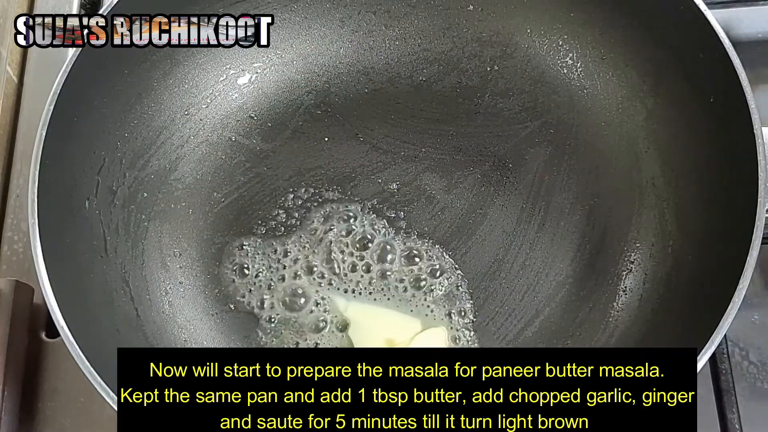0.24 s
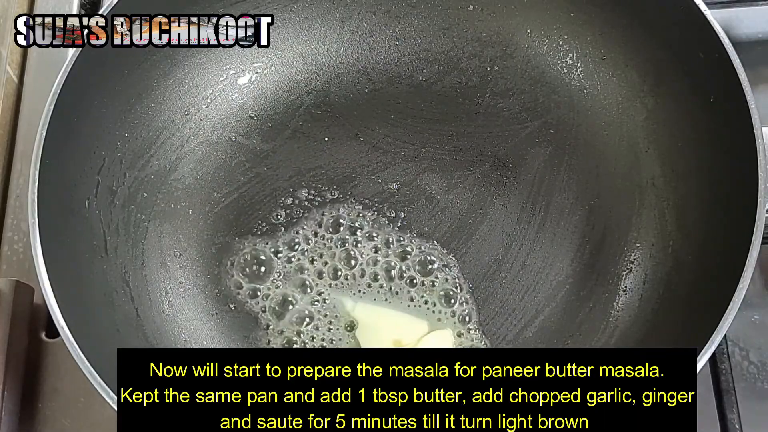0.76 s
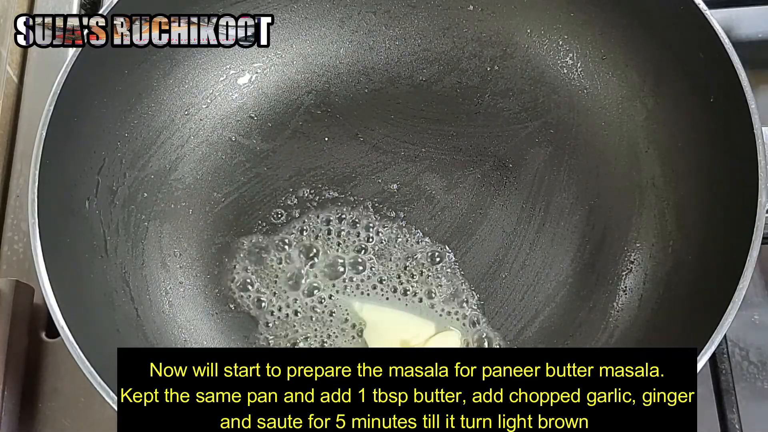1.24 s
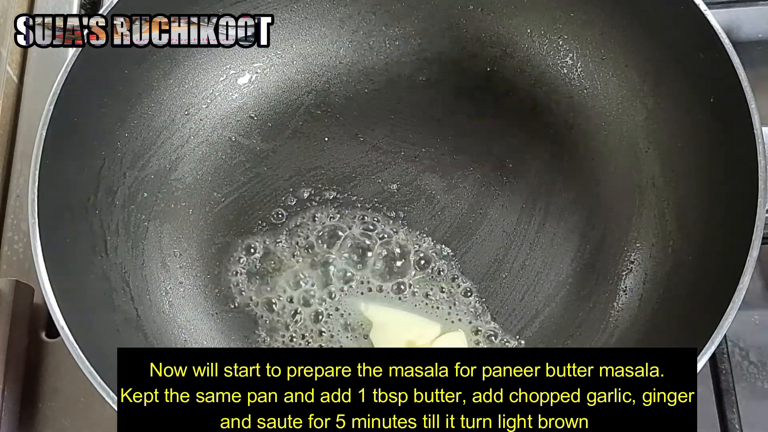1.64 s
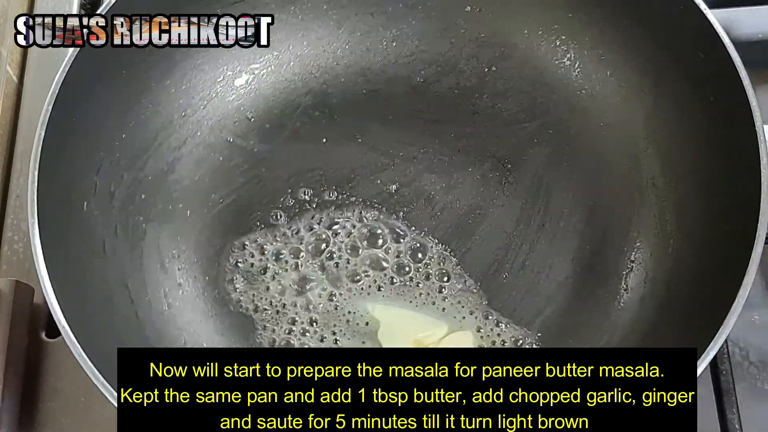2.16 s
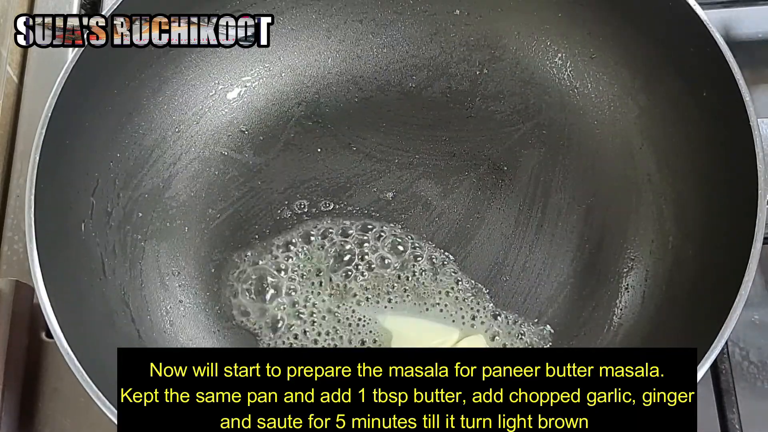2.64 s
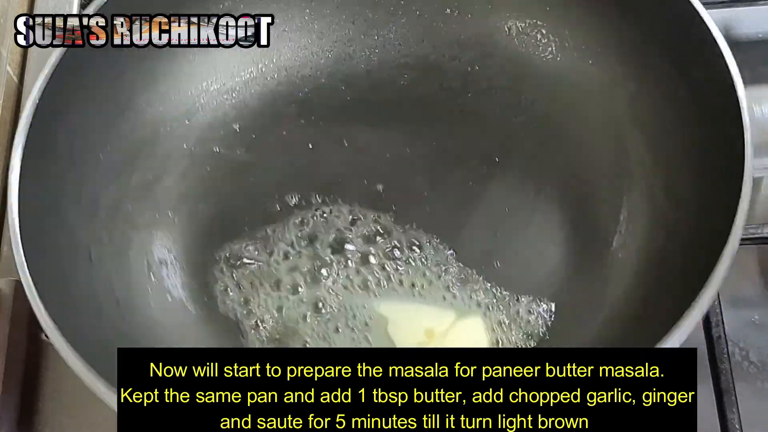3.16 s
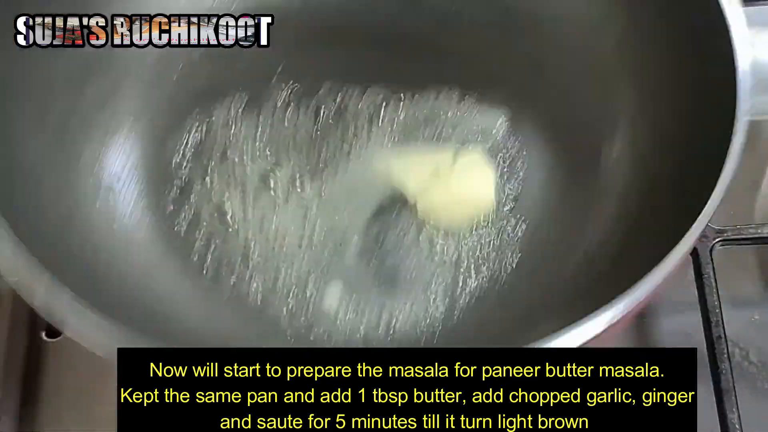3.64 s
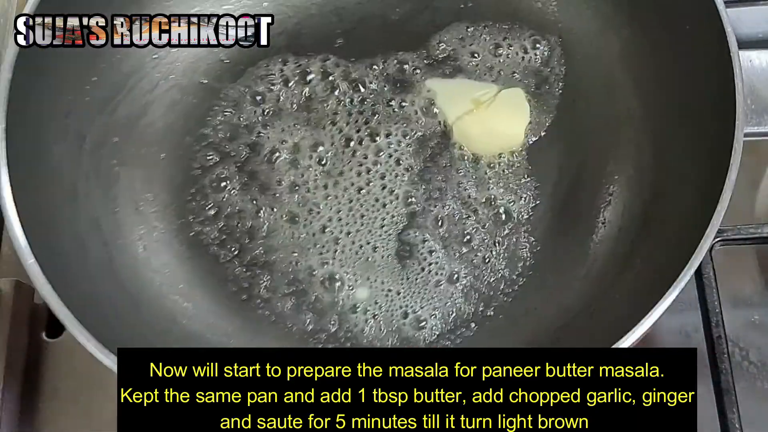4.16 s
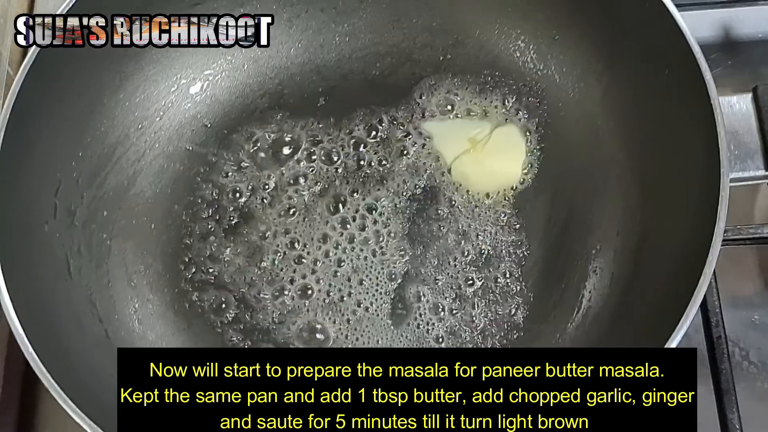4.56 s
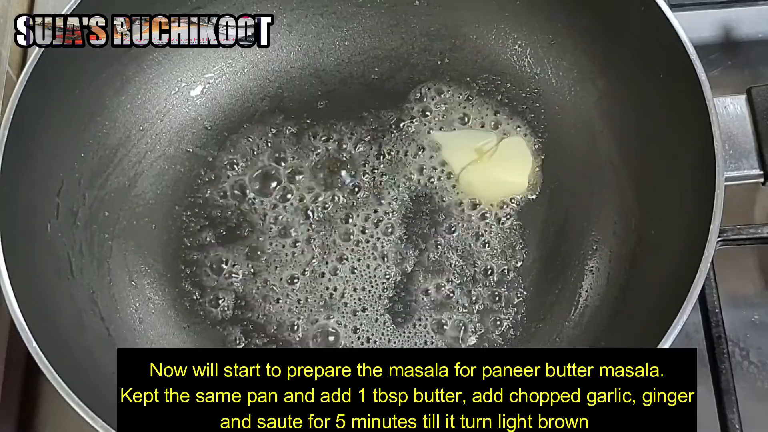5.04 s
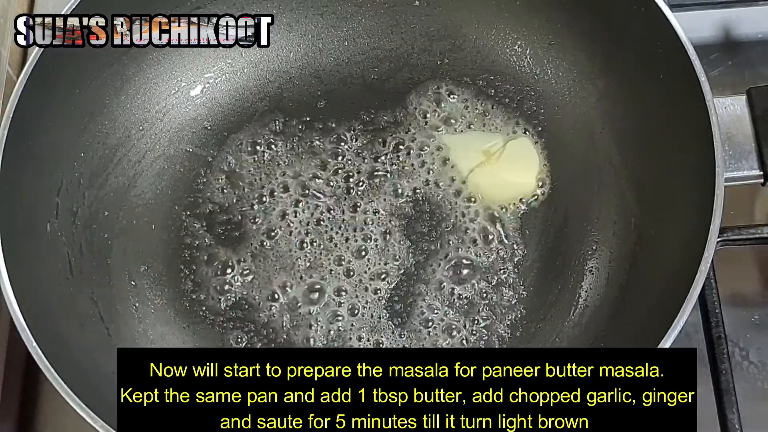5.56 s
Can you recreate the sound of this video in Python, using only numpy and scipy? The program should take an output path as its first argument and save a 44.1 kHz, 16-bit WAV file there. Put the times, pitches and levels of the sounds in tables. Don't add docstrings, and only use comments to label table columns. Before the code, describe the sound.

A thin, airy sizzle with tiny snapping bubbles and occasional wetter bursts, heard near the pan, with low room rumble beneath. A sudden loud rattling bang of utensil and stove metal comes at 2.2 seconds, with a short room tail. Small bumps and a faint rub follow, then the frying gets clearly louder and denser after four seconds, with one heavy clank and softer knocks before it sizzles on.

```python
import sys
import numpy as np
from scipy import signal
from scipy.io import wavfile

SR = 44100
rng = np.random.default_rng(int(sys.argv[2]) if len(sys.argv) > 2 else 0)


def invert_db(x):
    u = np.asarray(x, float) / 20
    return 10 ** u


def master_out(mix):
    frames = np.transpose(np.atleast_2d(mix))
    ceiling = np.clip(frames, -1, 1)
    pcm = np.round(ceiling * 32767).astype(np.int16)
    wavfile.write(sys.argv[1], SR, pcm)


N = 256044


def rms_one(x):
    return x / np.sqrt(np.mean(x ** 2) + 1e-20)


def at_hz(points, hz, column=1):
    points = np.array(points)
    return np.interp(np.log(hz), np.log(points[:, 0]), points[:, column])


def drift(rate_hz):
    r = np.exp(-80 * np.pi * rate_hz / SR)
    slow = signal.lfilter([1], [1, -2 * r, r * r], rng.standard_normal(N // 40 + 2002))[2000:]
    return np.interp(np.arange(N) / 40, np.arange(len(slow)), rms_one(slow))


def ring(x, hz, t60_s):
    r = invert_db(-60 / (t60_s * SR))
    w = 2 * np.pi * hz / SR
    return signal.lfilter([0, np.sin(w)], [1, -2 * r * np.cos(w), r * r], x + 1e-18)


def dying(x, t60_s):
    return signal.lfilter([1], [1, -invert_db(-60 / (t60_s * SR))], x + 1e-18)


def clicks(times_s, gains):
    out = np.zeros(N)
    out[np.round(np.asarray(times_s) * SR).astype(int)] = gains
    return out


def band(x, low_hz, high_hz):
    sos = signal.butter(2, [low_hz, high_hz], "band", fs=SR, output="sos")
    return signal.sosfilt(sos, x) / np.sqrt(2 * (high_hz - low_hz) / SR)


def split_bands(low_hz, high_hz, count):
    edges = np.geomspace(low_hz, high_hz, count + 1)
    return [(k, a, b, np.sqrt(a * b)) for k, (a, b) in enumerate(zip(edges, edges[1:]))]


def stereo(mid, side, alike):
    alike = np.clip(alike, 0, 1)
    return (np.sqrt(1 + alike) * mid + np.sqrt(1 - alike) * side * [[1], [-1]]) / np.sqrt(2)


def balance(left_minus_right_db):
    return invert_db(left_minus_right_db / 2 * np.array([[1], [-1]]))


def grains(per_s, spread_db):
    return (rng.random(N) < per_s / SR) * invert_db(spread_db * np.minimum(rng.exponential(1, N), 4))


# (time [s], level [dB])
VIGOUR = [(0.0, -50), (0.63, -52.5), (.85, -51), (1.1, -51.5), (1.5, -51), (1.7, -49.5), (1.9, -50),
          (2.9, -53.5), (3.27, -50.5), (3.42, -55.5), (3.52, -53), (3.65, -44), (4.0, -44.5), (4.2, -39.5),
          (4.72, -38.5), (5.0, -40.5), (5.81, -40.5)]
SIMMER_DB = -52


def vigour(lag_s=0):
    s, db = np.transpose(VIGOUR)
    return np.interp(np.arange(N) / SR - lag_s, s, db) - SIMMER_DB


# (frequency [Hz], density [dB per Hz])
FRY_COLOUR = [(880, 13), (1500, -16), (1720, -17), (1900, -11.5), (2130, -14), (2860, -12), (3480, -6.5),
              (3800, -8), (4720, -4.5), (5910, -4.5), (6650, -9), (8330, 3), (9370, 7), (15100, -0.5),
              (15600, 2.5)]
# (frequency [Hz], left minus right [dB])
FRY_BALANCE = [(60, 0.5), (130, 0.5), (290, 1.0), (640, 1.0), (1410, 0), (3100, -0.5), (6820, 0.5),
               (15000, 0.5)]
FRY_LIKENESS = 0.06
LARGE_BUBBLES_DB, LARGE_FOLLOW, LARGE_LAG_S = -55.5, 0.67, 0.062
STEADYING = 0.31


def sizzle():
    large_db = LARGE_BUBBLES_DB + LARGE_FOLLOW * vigour(LARGE_LAG_S)
    fine_db = SIMMER_DB + vigour()
    steadier = invert_db(-STEADYING * (fine_db - SIMMER_DB))
    whole_pan = dying(grains(27, 1.7), 0.09)
    large, fine = 0, 0
    for k, low_hz, high_hz, hz in split_bands(1300, 17000, 16):
        if k % 2 == 0:
            cluster = dying(grains(28, 1.5), 0.0094)
            snaps = grains(200, 3.58) * rng.choice([-1, 1], N)
        haze = rng.standard_normal((2, N))
        swell = 1 + (2.25 * cluster + 0.17 * whole_pan) * steadier
        mid, side = band(haze + [[1], [.6]] * (2.7 * snaps), low_hz, high_hz)
        level = invert_db(at_hz(FRY_COLOUR, hz) + 1.38 * drift(29.0)) * np.sqrt(high_hz - low_hz)
        one = level * swell * balance(at_hz(FRY_BALANCE, hz)) * stereo(mid, side, FRY_LIKENESS)
        if hz < 8200:
            large = large + one
        else:
            fine = fine + one
    return invert_db(large_db + 2.5) * rms_one(large) + invert_db(fine_db + 2.0) * rms_one(fine)


def shaken(lift_db, calms_s):
    s, thud_db = np.transpose(KNOCKS)[:2]
    return dying(clicks(s, invert_db(thud_db + lift_db)), calms_s)


def rumble_gain():
    return np.minimum(invert_db(3.7 + 2.5 * drift(2.1)) + shaken(lift_db=34.5, calms_s=1.8), invert_db(6))


# (time [s], half length [s], level [dB])
RUBS = [
    (2.469, 0.036, -41),
    (3.345, 0.031, -57),
    (3.942, 0.04, -51.5),
    (4.204, 0.1, -59.5),
    (4.341, 0.042, -52.5),
]


def support_gain():
    t = np.arange(N) / SR
    rubbing = sum(invert_db(db) * np.exp(-((t - s) / half_s) ** 2) for s, half_s, db in RUBS)
    return invert_db(-66.5 + 1.5 * drift(4.5)) + shaken(lift_db=-25, calms_s=0.3) + rubbing


# (frequency [Hz], density [dB per Hz])
ROOM = [(18, -38), (30, -17), (97, -4.5), (146, -14), (194, -9.5), (397, -24), (530, -22.5), (721, -20.5),
        (809, -19), (1020, -19.5), (1190, -19.5), (1620, -23.5), (1890, -25.5), (2340, -25), (3000, -20.5),
        (3900, -55), (6600, -120)]
ROOM_DB = -61
# (frequency [Hz], left-right likeness [0-1])
LIKENESS = [(60, 0.99), (130, 1), (290, 0.5), (640, 0.65), (1410, 0), (3100, 0), (6820, 0.056),
            (15000, 0.62)]


def room_rumble():
    white, out = rng.standard_normal((2, 2, N)), 0
    for k, low_hz, high_hz, hz in split_bands(32, 3200, 14):
        level = invert_db(at_hz(ROOM, hz)) * np.sqrt(high_hz - low_hz)
        out = out + level * stereo(*band(white[k % 2], low_hz, high_hz), at_hz(LIKENESS, hz))
    return invert_db(ROOM_DB) * rms_one(out)


# (frequency [Hz], width [Hz], level [dB])
HUM = [(45.7, 20, -54.5), (95.44, 4.45, -55.5), (152.2, 3, -70.5), (182, 3.3, -68.5), (202, 11.3, -68.5),
       (357, 3.7, -78), (542.7, 12, -70.5), (608, 54, -70.5), (1915, 35, -69)]
SUPPORT_HZ, SUPPORT_WIDTH_HZ, SUPPORT_T60_S = 739, 10, 0.17


def hum():
    out, rumble = room_rumble(), rumble_gain()
    lines = [(hz, width_hz, invert_db(db) * (rumble if hz < 130 else 1)) for hz, width_hz, db in HUM]
    lines.append((SUPPORT_HZ, SUPPORT_WIDTH_HZ, support_gain()))
    for hz, width_hz, gain in lines:
        noise = rng.standard_normal((2, N + SR // 2))
        mid, side = ring(noise, hz, 2.46 / width_hz)[:, SR // 2:]
        out += gain * rms_one(stereo(mid, side, at_hz(LIKENESS, hz)))
    return out


# (time [s], peak [dB], pitch [Hz], left minus right [dB])
POPS = [(0.0582, -28.5, 10500, .6), (0.1521, -35, 8820, .6), (0.2309, -42, 13200, -22),
        (0.3514, -29.5, 12200, 2), (0.616, -35, 11100, .6), (0.6743, -31, 9900, 1),
        (0.8495, -28, 11700, .6), (1.1084, -36, 9030, 5), (1.237, -35.5, 8000, -3), (1.4521, -37, 13400, 1),
        (1.616, -35, 10000, 4), (1.6628, -28, 7840, -1.5), (1.7464, -33, 10400, 7),
        (1.8204, -36, 13400, -7), (1.988, -30, 10600, 2), (2.665, -27, 10700, 2), (2.819, -24, 9400, 4),
        (3.231, -33, 10200, 4), (3.2535, -32, 8650, 1), (3.3537, -24.5, 10300, 2),
        (3.4431, -35.5, 9500, -6), (3.6439, -24.5, 10500, 3.5), (3.6765, -29, 9900, 5.5),
        (3.8752, -26.5, 9410, 5), (4.0387, -25.5, 10300, 5.5), (4.105, -18.5, 10100, 4),
        (4.477, -25, 9000, -1.1), (5.2349, -19, 10800, 5), (5.5855, -25, 8600, 3),
        (5.6189, -24.5, 11700, 5)]
# (time [s], peak [dB], pitch [Hz])
BURSTS = [(0.1992, -40, 5180), (0.4579, -39, 5760), (0.5734, -34.5, 7200), (0.9397, -33, 5400),
          (1.347, -31.5, 5400), (2.074, -36.5, 5300), (2.4568, -36, 5950), (2.542, -39, 5600),
          (3.0415, -37, 3940), (3.0714, -41, 5460), (3.13, -37, 5700), (2.7393, -33.5, 5100),
          (2.8858, -32.5, 5900), (3.6172, -38.5, 5000), (3.789, -35, 4700), (5.1782, -27.5, 6200),
          (5.2918, -33, 5760)]
POP_SPRAY_DB, BURST_SPRAY_DB = -11, -9
FAINT_POP_DB, FAINT_FOLLOW, FAINT_SPREAD_DB, FAINT_PAN_DB = -41, 0.21, 2.5, 3
FAINT_LOW_HZ, FAINT_HIGH_HZ = 8200, 11800


def all_pops():
    place, pitch = rng.random((2, 48))
    size, side = rng.standard_normal((2, 48))
    s = place * (N - 1) / SR
    faint_db = FAINT_POP_DB + FAINT_FOLLOW * vigour()[(s * SR).astype(int)] + FAINT_SPREAD_DB * size
    faint_hz = FAINT_LOW_HZ * (FAINT_HIGH_HZ / FAINT_LOW_HZ) ** pitch
    clear = [tuple(row) + (POP_SPRAY_DB,) for row in POPS]
    low = [tuple(row) + (0, BURST_SPRAY_DB) for row in BURSTS]
    faint = [row + (POP_SPRAY_DB,) for row in zip(s, faint_db, faint_hz, FAINT_PAN_DB * side)]
    return clear + low + faint


SNAP_CYCLES = 1.7
TICK_DB, TICK_S = -11, 0.00003


def pops():
    out, t = np.zeros((2, N + 4000)), np.arange(4000) / SR
    after = t - 0.0015
    spray_swell = (1 - np.exp(-t / 0.00042)) * invert_db(-60 * t / 0.092)
    tick = invert_db(TICK_DB) * after / TICK_S * np.exp(.5 - .5 * (after / TICK_S) ** 2)
    for s, peak_db, hz, pan_db, spray_db in all_pops():
        snap = np.sin(2 * np.pi * hz * after) * np.exp(-(after * hz / SNAP_CYCLES) ** 2)
        noise = rng.standard_normal((2, len(t)))
        spray = invert_db(spray_db) * band(noise, hz / 1.197, min(hz * 1.19, 18000)) * spray_swell
        i = round(s * SR)
        out[:, i:i + len(t)] += invert_db(peak_db) * balance(pan_db) * (snap + tick + spray)
    return out[:, :N]


def struck(s, blow_db, modes, spread_db, dulling=0, late_cycles=0, rattle=0):
    vary = rng.standard_normal((len(s), len(modes)))
    lag = rng.random((len(s), len(modes)))
    chatter = rng.standard_normal((2, N))
    softness_db = blow_db - np.max(blow_db)
    out = 0
    for k, (hz, db, t60_s) in enumerate(modes):
        lost_db = dulling * softness_db * max(np.log2(hz / 1000), 0)
        start_s = s + late_cycles / hz + 0.001817 * lag[:, k]
        blows = clicks(start_s, invert_db(blow_db + db + lost_db + spread_db * vary[:, k]))
        drive = blows + rattle * chatter * dying(blows, 1.37 * t60_s) / np.sqrt(t60_s * SR / 14)
        out = out + ring(drive, hz, 0.79 * t60_s)
    return out


KITCHEN_T60_S, KITCHEN_DB = 0.24, -9


def kitchen(x):
    t = np.arange(SR // 2) / SR
    echoes = rng.standard_normal((2, len(t))) * invert_db(-60 * t / KITCHEN_T60_S) * (1 - np.exp(-t / 0.0072))
    echoes /= np.sqrt(np.sum(echoes ** 2, axis=1, keepdims=True))
    direct = np.stack([x[0], np.roll(x[1], 3)])
    return direct + invert_db(KITCHEN_DB) * signal.fftconvolve(x, echoes, axes=1)[:, :N]


# (frequency [Hz], level [dB], t60 [s])
STOVE = [(73.4, 0.5, 0.64), (92, 2.5, 0.45), (184, -2.5, 0.28), (243, -9, 0.27), (269.5, -7, 0.36),
         (295, -8, 0.34)]


def panels(s, thud_db):
    boom = struck(s, thud_db - 0.5, STOVE, spread_db=2, late_cycles=0.91, rattle=0.25)
    low_pass = signal.butter(2, 330, fs=SR, output="sos")
    return signal.sosfilt(low_pass, boom.mean(axis=0))


UTENSIL_HZ = [576, 790, 1175, 1320, 1485, 1690, 2200, 2345, 2700, 2950, 3055, 3290, 3750, 3880, 4290, 5190,
              5480, 5700, 6025, 6750, 7110, 8550, 9700]
# (level [dB], t60 [s])
UTENSIL = [(-16, 0.39), (-23.5, 0.5), (-10, 0.25), (4.5, 0.058), (1.5, 0.048), (-6.5, 0.13), (-7.5, 0.091),
           (-6.5, 0.061), (-15, 0.093), (-6, 0.12), (5, 0.065), (-35.5, 0.093), (-2, 0.045), (-18, 0.35),
           (3.5, 0.029), (-4.5, 0.069), (1, 0.061), (-23, 0.31), (-16, 0.054), (-20, 0.075), (-10, 0.045),
           (-17, 0.19), (-9, 0.046)]


def utensil(s, blow_db):
    modes = np.column_stack([UTENSIL_HZ, UTENSIL])
    return struck(s, blow_db, modes, spread_db=1.5, dulling=0.63, rattle=0.68)


GRATE_HZ = [430, 505, 572, 988, 1136, 1420, 1488, 1637, 2472, 2895, 3840, 4310, 4840, 5180, 5450]
# (level [dB], t60 [s])
GRATE = [(-13.5, 0.17), (-12, 0.41), (-9.5, 0.26), (3.5, 0.07), (-8.5, 0.11), (-19, 0.051), (0, 0.065),
         (-14.5, 0.081), (-4.5, 0.04), (-14.5, 0.097), (-13, 0.056), (-12, 0.064), (-13, 0.031),
         (-3, 0.051), (0, 0.027)]


def grate(s, blow_db):
    modes = np.column_stack([GRATE_HZ, GRATE])
    return struck(s, blow_db, modes, spread_db=1.5, dulling=0.94, rattle=0.67)


# (time [s], level [dB])
NUDGES = [(2.1855, -34.5), (2.2843, -29), (2.80, -57), (2.97, -56), (3.045, -43.5), (3.125, -40),
          (3.26, -62.5), (3.30, -61.5), (3.33, -55.5), (4.699, -16.5), (4.930, -29), (5.05, -45)]


def nudged_support():
    s, db = np.transpose(NUDGES)
    return ring(clicks(s, invert_db(db)), SUPPORT_HZ, SUPPORT_T60_S)


# (time [s], level [dB])
TINGS = [
    (2.5632, -29.5),
    (2.678, -44.5),
]
# (frequency [Hz], level [dB], t60 [s])
STEEL = [
    (1810, 0, .08),
    (4090, -1.5, .1),
    (7214, -16, .05),
]


def tings():
    return struck(*np.transpose(TINGS), STEEL, spread_db=-0.5, rattle=0.24)


# (frequency [Hz], t60 [s], level [dB])
TAIL = [(60, 1, -13), (204, 0.69, -3.5), (560, 0.52, 0.5), (1400, 0.58, 0), (2770, 0.39, 1),
        (5150, 0.21, 6), (12200, 0.21, -8)]


def crack_and_wash(s, thud_db, body_db, crack_db):
    top_db = crack_db + 0.29 * np.minimum(crack_db - body_db, 0)
    knots_hz = [200, 1200, 4000, 12000]
    rows = list(zip(thud_db, body_db, crack_db, top_db))
    white, out = rng.standard_normal((2, 2, N)), 0
    for k, low_hz, high_hz, hz in split_bands(60, 16000, 16):
        strength_db = np.array([np.interp(np.log(hz), np.log(knots_hz), row) for row in rows])
        blows = clicks(s, invert_db(strength_db + at_hz(TAIL, hz, column=2)))
        crack = invert_db(-9.0) * dying(blows, 0.011) * (hz > 400)
        build_up = dying(blows, 0.0067 + 12 / hz)
        wash = invert_db(-15.0) * (dying(blows, at_hz(TAIL, hz)) - build_up)
        mid, side = band(white[k % 2] * [crack + wash, .5 * crack + wash], low_hz, high_hz)
        out = out + stereo(mid, side, at_hz(LIKENESS, hz))
    return out


# (time [s], thud [dB], clack [dB], brightness [dB], share on the grate [0-1])
KNOCKS = [(2.1868, -26.5, -52, 3, 0.3), (2.2384, -24.5, -25.5, -4, 0.07), (2.2844, -16.5, -17.5, 1.5, 0.15),
          (2.312, -28, -37, -22, .3), (2.561, -40, -46, 9, 0), (2.678, -51.5, -50, 9.5, 0.02),
          (2.79, -53, -51, -35, 0), (3.043, -40.5, -40, -3, 0), (3.077, -59, -63, -15, .1),
          (3.125, -40, -69.5, 21, 0.5), (4.699, -20, -25, 3.5, 0.96), (4.929, -32.5, -35.5, -36, 0.71),
          (4.972, -41.5, -36.5, -5, 0.1), (5.052, -39.5, -53, -31, .8)]
UTENSIL_RING_DB, GRATE_RING_DB = 2, 8.5


def knocks():
    s, thud_db, body_db, bright_db, on_grate = np.transpose(KNOCKS)
    on_grate = np.clip(on_grate, .001, .999)
    utensil_db = body_db + UTENSIL_RING_DB + 20 * np.log10(1 - on_grate)
    grate_db = body_db + GRATE_RING_DB + 20 * np.log10(on_grate)
    boom = panels(s, thud_db)
    metal = utensil(s, utensil_db) + grate(s, grate_db) + nudged_support() + tings()
    return boom + kitchen(metal) + crack_and_wash(s, thud_db, body_db, body_db + bright_db)


# (time [s], peak [dB])
SLAPS = [
    (2.2851, -7.5),
    (4.7, -33),
    (4.9295, -40),
    (2.2395, -16),
]
SLAP_HZ, SLAP_CYCLES = 1500, 1


def slaps():
    t = np.arange(200) / SR
    s, db = np.transpose(SLAPS)
    pulse = -np.sin(2 * np.pi * SLAP_HZ * t) * np.exp(-(t * SLAP_HZ / SLAP_CYCLES) ** 2)
    return np.convolve(clicks(s, invert_db(db)), pulse / np.max(np.abs(pulse)))[:N]


# (time [s], level [dB])
RIM_BLOWS = [
    (2.2852, -23),
    (2.3215, -27),
    (2.347, -29),
]
# (frequency [Hz], level [dB], t60 [s])
RIM = [
    (5560, -7, .1),
    (5700, -11, .12),
    (8550, -21, .17),
]


def rim():
    return kitchen(struck(*np.transpose(RIM_BLOWS), RIM, spread_db=1.5, rattle=.9))


def scene():
    return sizzle() + pops() + knocks() + hum() + slaps() + rim()


def top_cut(x):
    return signal.sosfilt(signal.butter(12, 16850, fs=SR, output="sos"), x)


LOW_CUT_HZ, TOP_HZ = 52.3, 15760


def record(dry):
    x = signal.sosfilt(signal.butter(6, LOW_CUT_HZ, "high", fs=SR, output="sos"), dry)
    x = signal.sosfilt(signal.ellip(14, .5, 85, TOP_HZ, fs=SR, output="sos"), x)
    mix = np.clip(x, -1, 1)
    return top_cut(mix)


dry = scene()
out = record(dry)
master_out(out)
```